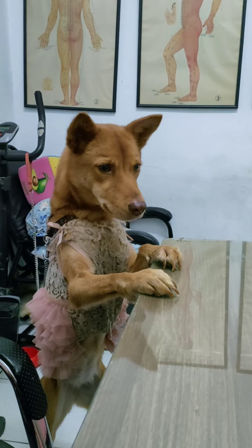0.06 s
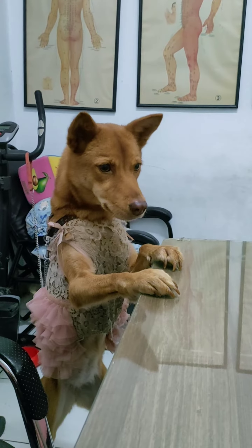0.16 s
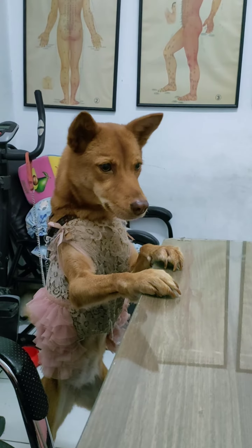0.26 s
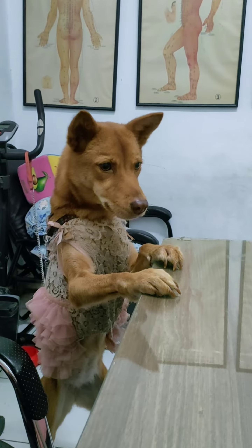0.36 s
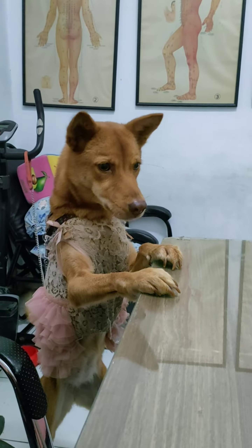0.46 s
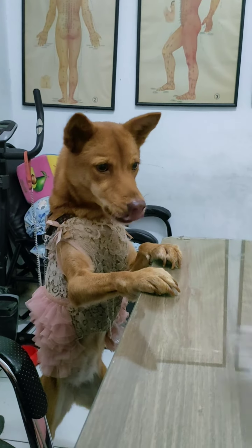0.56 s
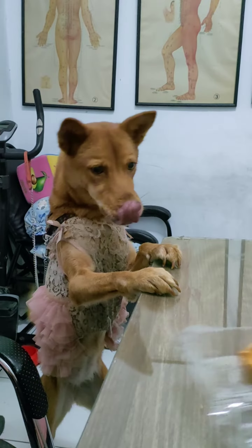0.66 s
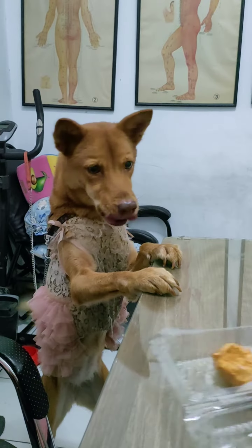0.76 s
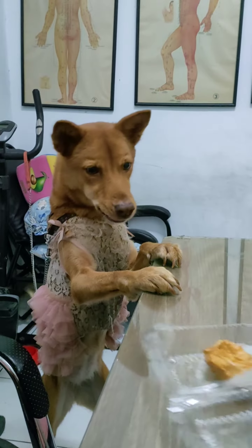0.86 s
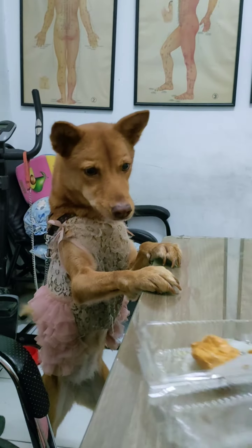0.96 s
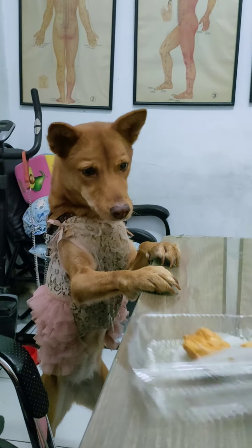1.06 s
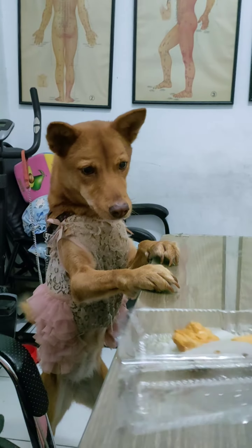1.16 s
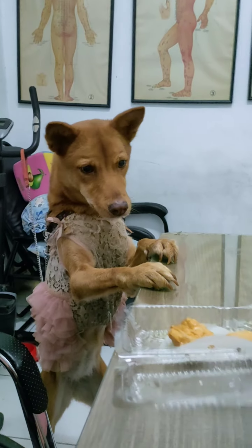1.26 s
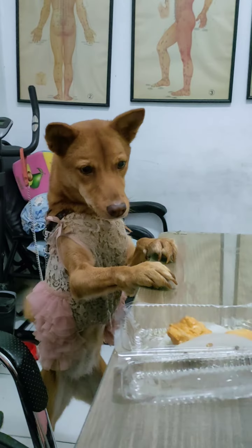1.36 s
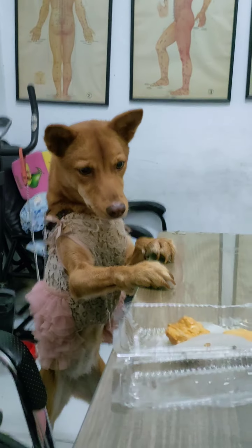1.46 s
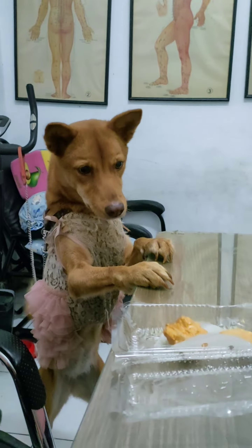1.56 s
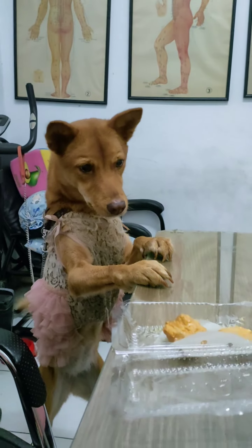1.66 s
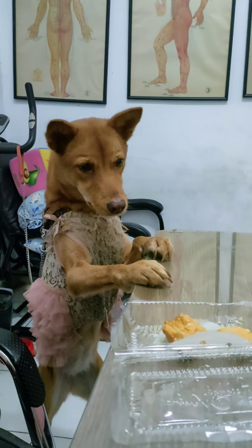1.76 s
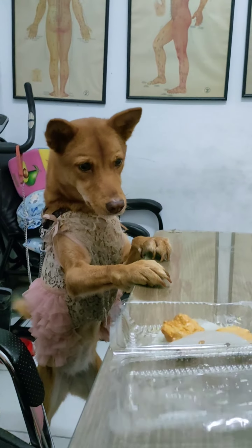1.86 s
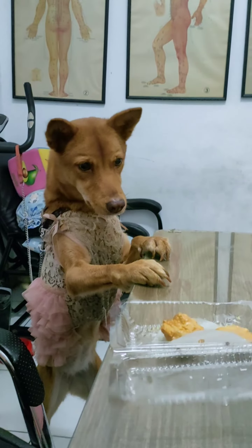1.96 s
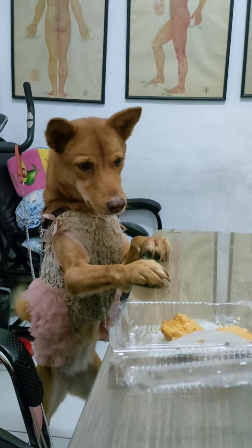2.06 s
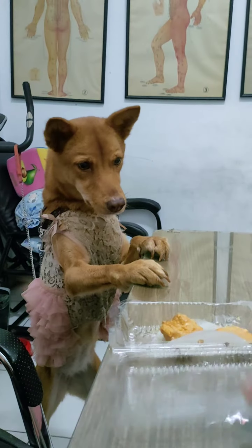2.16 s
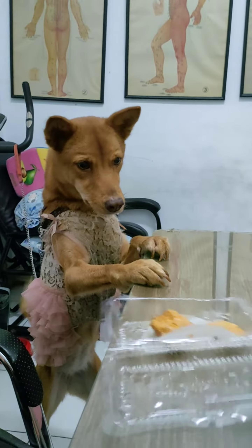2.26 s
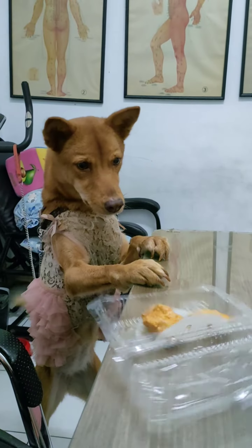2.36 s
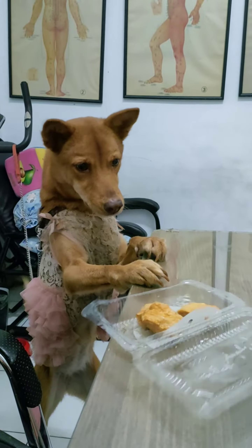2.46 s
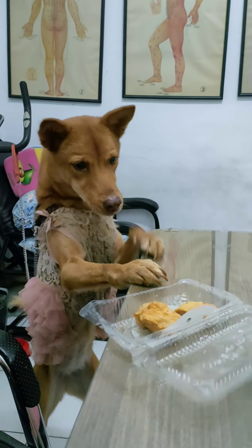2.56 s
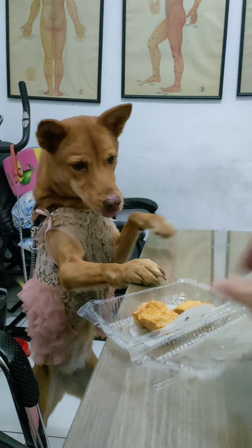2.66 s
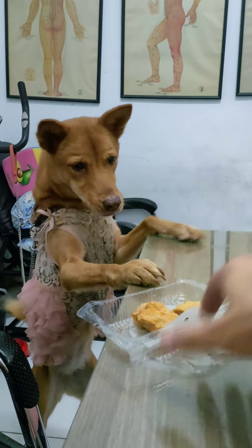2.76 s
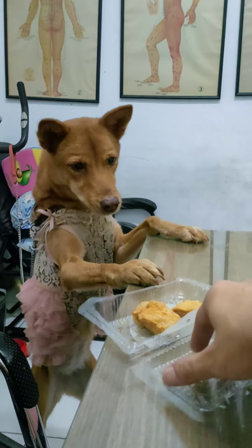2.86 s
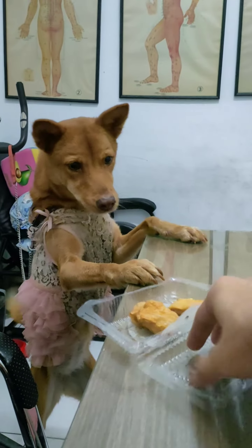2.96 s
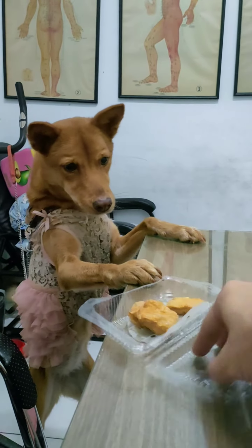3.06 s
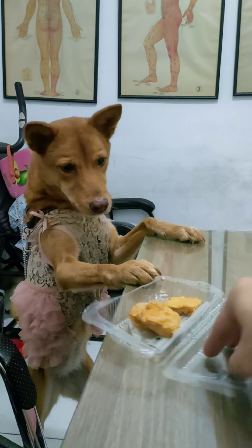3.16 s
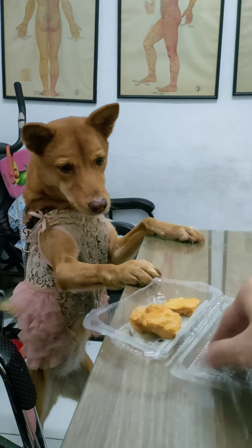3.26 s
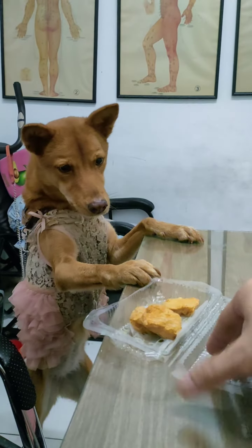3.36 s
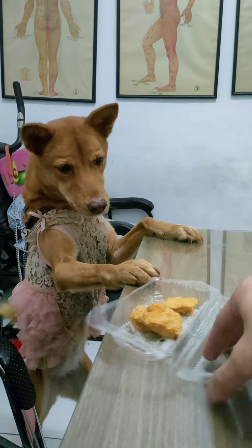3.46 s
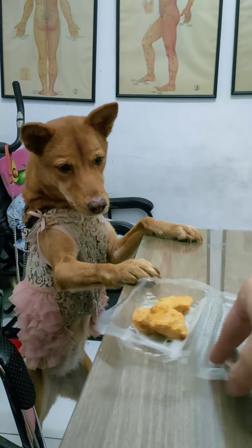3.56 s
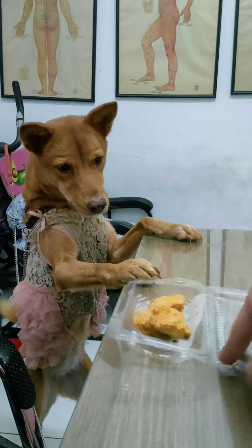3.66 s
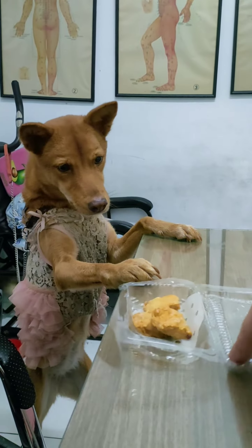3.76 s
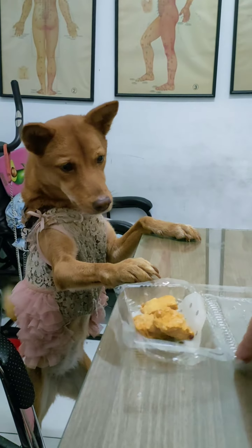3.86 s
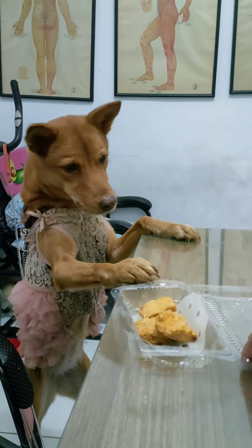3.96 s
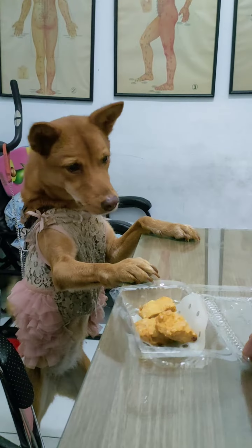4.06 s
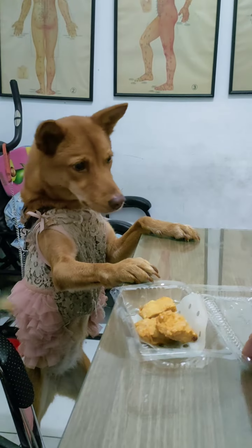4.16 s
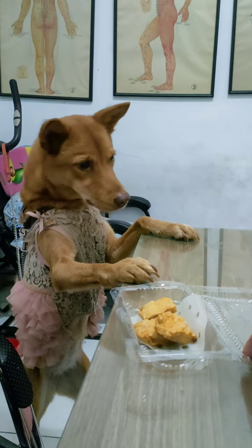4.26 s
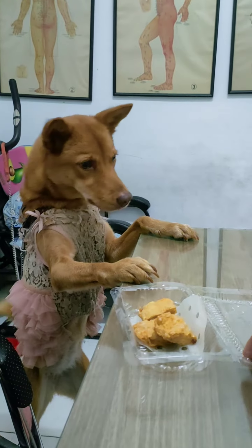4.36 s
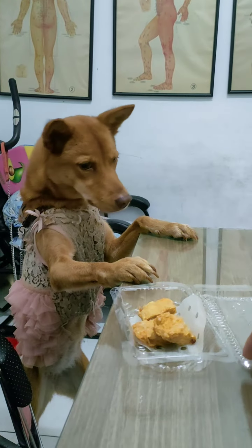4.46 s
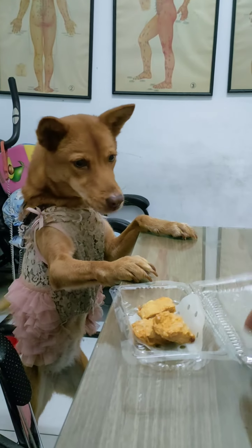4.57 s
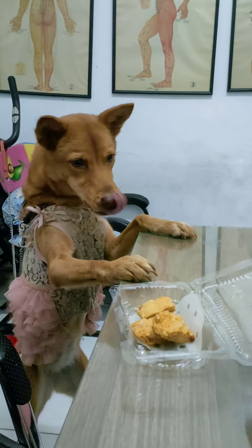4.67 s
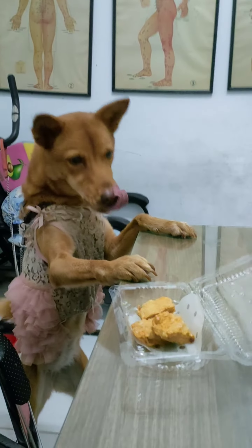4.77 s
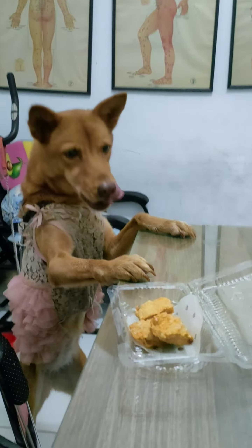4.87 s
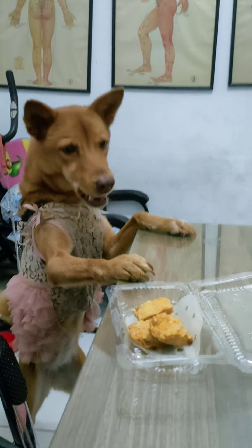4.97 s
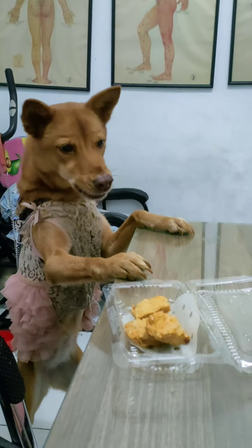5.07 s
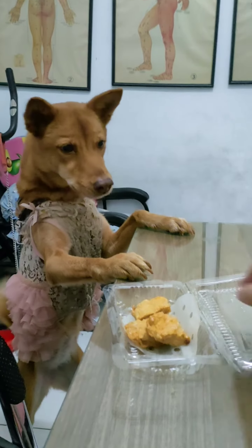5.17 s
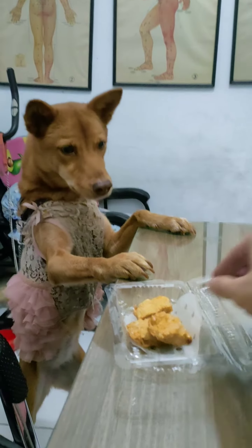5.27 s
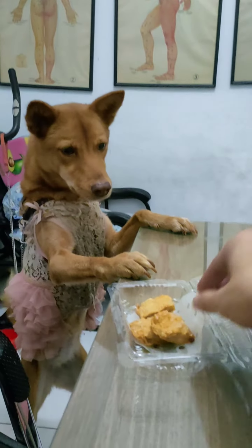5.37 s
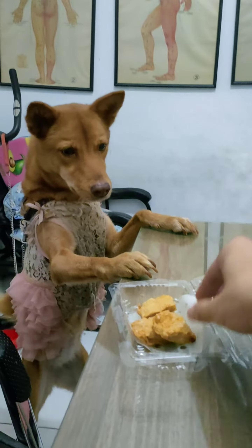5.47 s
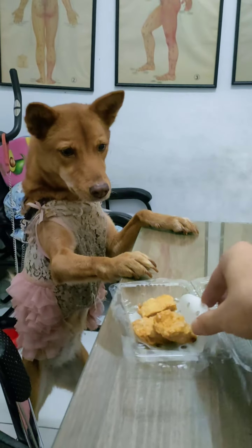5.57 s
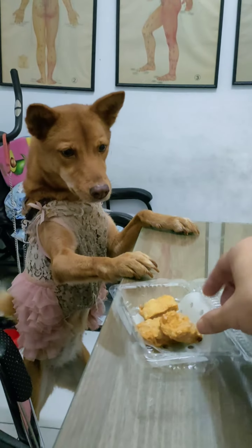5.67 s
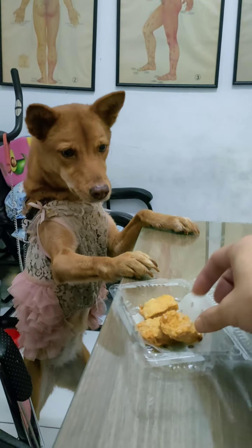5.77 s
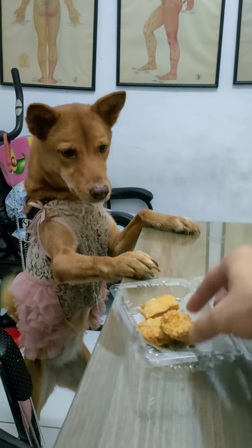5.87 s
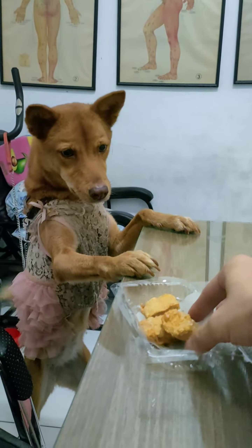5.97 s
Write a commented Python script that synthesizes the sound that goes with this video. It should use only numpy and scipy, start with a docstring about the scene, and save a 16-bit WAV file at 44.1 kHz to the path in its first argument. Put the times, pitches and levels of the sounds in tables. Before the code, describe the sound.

A thin, stiff plastic food tray is handled close to the microphone in a bare, hard-walled room. A dense flurry of crackles and sharp pops comes first, with one hard snap, then near quiet, small clicks, a louder crunchy burst as it is turned, more pops, and finally soft rubbing on paper. Low handling rumble and faint room hush lie underneath.

```python
"""A thin plastic food tray is carried to a table, set down, turned and opened close to a two-port microphone.
Wall snaps, fine crackle, knocks and drag noise drive one bank of resonant modes; at the end paper-liner rubs
are band-passed random grains. A bare, hard room answers with decaying noise bands. The hand on the microphone
adds resonant low rumble and decaying sine bumps; wavering sines whine faintly over a coloured-noise room tone."""
import sys
import numpy as np
from scipy import signal
from scipy.io import wavfile

SR = 44100
rng = np.random.default_rng(int(sys.argv[2]) if len(sys.argv) > 2 else 0)


def file_out(sig):
    """Save sig as 16-bit WAV at sys.argv[1]."""
    # one column per channel
    cols = np.atleast_2d(sig).T
    # limit, then scale
    lim = np.clip(cols, -1, 1)
    pcm = np.round(lim * 32767).astype(np.int16)
    wavfile.write(sys.argv[1], SR, pcm)


N = 265482

# wall snaps: start_s, drive_db, hollow_db, edge_db, length_ms (before low-mode stretch); colours re drive
WALL_SNAPS = [(0.09, -34, -12, -38, 4.6), (0.112, -32.5, -8, -26.5, 0.69), (0.147, -15.5, -17, -52, 2.4),
              (0.188, -26.5, -12.5, -24, 4.8), (0.216, -30.5, -15, -29, 3.3), (0.302, -27.5, -12, -12, 1.4),
              (0.371, -18.5, -16.5, -12.5, 1.3), (0.381, -5.5, -21, -6.5, 3), (0.396, -23.5, -17, -15, 0.9),
              (0.411, -20.5, -19.5, -21, 1.2), (0.418, -12, -15, -12, 1.16),
              (0.451, -15.5, -23.5, -16, 0.81), (0.456, -25.5, -11.5, -24, 0.81),
              (0.4668, -8, -18, -15.5, 0.56), (0.499, -18, -27.5, -8.5, 0.91),
              (0.511, -21.5, -23.5, -12, 4.4), (0.557, -13.5, -20, -7.5, 3.1),
              (0.567, -23.5, -8.5, 1.5, 0.66), (0.763, -41, 5, -21, 1.7), (0.824, -34.5, -4.5, -26, 1),
              (0.847, -33.5, -5, -23, 1.7), (0.917, -34.5, -13.5, -20.5, 5.7),
              (1.108, -20.5, -14, -1.5, 1.9), (1.1999, -1, -13.5, -3.5, 0.4), (1.761, -42, -9.5, -20, 1.06),
              (1.827, -32.5, -8, -13, 2.7), (1.844, -31.5, -2, -23, 1.9), (1.903, -28, -18, -8.5, 0.76),
              (1.914, -40.5, 12.5, -14, 3.3), (1.965, -37, -7, -8.5, 0.87), (2.186, -50.5, 1.5, -7, 0.84),
              (2.291, -29, 1.5, -2.5, 1.2), (2.309, -27.5, -8.5, -27, 1.3), (2.353, -18.5, -2, -6, 0.89),
              (2.359, -19, -10.5, -12, 1.6), (2.366, -21, -9, -16.5, 2.7), (2.416, -30.5, 3.5, -19, 1.1),
              (2.54, -22.5, -6, -16.5, 1.6), (2.557, -16.5, -11, -28.5, 0.78), (2.878, -43, -8, -1.5, 3),
              (2.925, -28.5, -6, -9, 2.1), (2.941, -26.5, -3, -7, 1.7), (2.978, -14, -21, -9.5, 2.4),
              (2.987, -12, -13, -10, 1.8), (2.997, -17.5, -9.5, -22, 2), (3.012, -11, -25.5, -10.5, 3.2),
              (3.03, -20, -16, -9, 1.6), (3.097, -10, -23, -10, 2.9), (3.12, -21.5, -22, 0, 5.3),
              (3.57, -17, -13.5, -11.5, 0.8), (3.641, -17.5, -14, -35, 1.8), (3.706, -36, -2, -11, 1.1),
              (3.709, -30, 7, -15, 0.45), (3.719, -22, 0, -25, 1.4), (3.73, -12, -16, -11.5, 2.2),
              (3.794, -25.5, 3.5, 0, 1.6), (3.803, -32.5, 6.5, -24, 1.7), (3.846, -21, -34, -6, 1.4),
              (3.855, -29, 0.5, -15, 3.3), (3.912, -15.5, -22, -20.5, 0.47), (4.011, -36, -4, -27, 2.9),
              (4.462, -41.5, -3.5, -5, 2.1), (4.587, -37, 5, -2.5, 2.9), (4.888, -51, 4.5, 12, 1.6),
              (4.912, -37.5, -13, -8, 0.37)]
# knocks on hand or table, mostly slow modes: start_s, drive_db
TRAY_KNOCKS = [(.148, -32.5), (0.188, -38.5), (.275, -39), (0.361, -26.5), (0.666, -36), (0.739, -35.5),
               (1.091, -43), (1.902, -28.5), (2.188, -42), (2.291, -38.5), (2.351, -29), (2.939, -32),
               (3.015, -28), (3.097, -26.5), (3.194, -28.5), (3.57, -33.5), (3.708, -26), (3.796, -26),
               (3.858, -30), (3.914, -38.5), (4.784, -43), (4.891, -44)]
# knock colour re drive: hollow_db, middle_db, edge_db
KNOCK_COLOUR_DB = (-9.5, -35.5, -45.5)
# pitches of the five blow colours, thud to top: pitch_hz
BLOW_COLOUR_HZ = [450, 1160, 2500, 5700, 11000]
# tray modes: pitch_hz, gain_db, t60_s, left_right_db
TRAY_MODES = [(141, -1.5, 0.031, -3.5), (236, 0, 0.043, -3.5), (361.4, 0, 0.015, 2),
              (550, -4.5, 0.022, 1.5), (797, 2.5, 0.0092, -11), (1163.5, 4.5, 0.023, -14.5),
              (1371, 5, 0.0095, -4.5), (1860, 5.5, 0.0051, -4), (2260, 3, 0.0081, 0.5),
              (2717, 2.5, 0.0084, -17), (3145, 1.5, 0.01, 6), (3772, 3, 0.0053, 1), (4620, 3, 0.0037, -8),
              (4990, 2.5, 0.0023, -2), (5594, 0.5, 0.0065, -4.5), (6370, -3.5, 0.0069, -3),
              (7210, -5.5, 0.0051, 5), (8060, -6, 0.0013, 0), (11060, -4, 0.0038, -9),
              (12760, -6, 0.0027, 13), (14800, -1, 0.0023, -2)]
# steady rustle of the held tray: time_s, drive_db
HELD_RUSTLE = [(0, -78), (.07, -52), (.36, -46.5), (.68, -50), (.81, -43), (.92, -53.5), (1.15, -50),
               (1.8, -73.5), (2.83, -73.5), (2.93, -48.5), (3.3, -53.5), (3.45, -55.5), (3.65, -62),
               (4.08, -49.5), (4.3, -69.5), (4.44, -50.5), (4.56, -72), (4.92, -61.5), (5.1, -68.5),
               (5.33, -56.5), (5.5, -77), (6.02, -94)]
# squeezes, rise and fade per 20 dB: peak_s, drive_db, rise_s, fade_s, brightness_db_per_octave
FINGER_SQUEEZES = [(0.3, -41.5, 0.053, 0.39, -11.5), (0.379, -33, 0.012, 0.16, -12),
                   (1.85, -42.5, 0.021, .15, -7), (1.909, -34.5, 0.0073, 0.055, -2.5),
                   (2.3, -40.5, 0.02, 0.09, -10), (2.358, -29, 0.0077, 0.041, -4.5),
                   (2.385, -54, .03, 0.35, 7), (2.54, -38.5, 0.038, 0.11, 2),
                   (2.986, -21.5, 0.012, 0.069, -2), (3.114, -33.5, 0.086, 0.051, -5),
                   (3.2, -34, 0.024, 0.018, 2), (3.722, -36.5, 0.042, 0.066, 2.5),
                   (3.803, -43, 0.023, 0.032, 11), (3.858, -37.5, 0.13, 0.048, -0.5),
                   (4.587, -43.5, 0.025, 0.053, 1), (4.649, -50.5, 0.2, 0.055, -3),
                   (5.07, -56, 0.14, 0.11, 0.5), (5.244, -58, 0.027, 0.044, 5)]
# crackle grain by grip: crackle_db, size_spread_db, loss_db_per_octave (under the knee)
GRIP_UNEVENNESS = [(-52, 1.2, 6), (-36, 4.2, 3)]
# tray and hand dragging on the table: time_s, drive_db
TABLE_DRAG = [(0.0, -80), (0.4, -66.5), (1.66, -78), (2.98, -72), (3.12, -54.5), (3.32, -78.5), (3.59, -76),
              (3.75, -59.5), (4.06, -83.5), (5.4, -71.5), (6.02, -80.5)]
# near sound at the two ports: pitch_hz, likeness (0-1)
PORT_LIKENESS = [(350, 0.92), (700, 0.6), (3000, 0.3), (9000, 0.1)]
# paper-liner rubs, rise and fade per 20 dB: peak_s, level_db, rise_s, fade_s, centre_hz
PAPER_RUBS = [(5.582, -53, .006, 0.084, 1880), (5.662, -46.5, 0.043, 0.064, 1580),
              (5.729, -50, 0.031, 0.056, 2050), (5.784, -53.5, 0.062, 0.064, 4250),
              (5.839, -54, 0.17, .02, 2200)]
# room echoes: pitch_hz, t60_s, level_db, left_right_db, likeness (0-1)
ROOM_BANDS = [(120, 0.36, -44.5, -5, 0.55), (306, 0.38, -26, 2.5, 0.61), (520, 0.51, -26, -4, 0.11),
              (1260, 0.47, -32.5, -6, 0.038), (2685, 0.62, -29, 0.5, 0.05), (5500, 0.53, -26, 1.5, 0.015),
              (12200, 0.53, -28, -2.5, 0.025)]
# nearest walls, above the echo cloud: delay_s, extra_db
NEAR_WALLS = [(0.016, 5), (0.024, 3.5)]
# grip shifts: start_s, level_db, pitch_hz, t60_s, left_right_db
GRIP_BUMPS = [(1.207, -30, 28.4, 0.12, -3), (1.649, -49, 45.7, 0.21, -16), (2.53, -46.5, 45, 0.21, -18),
              (4.909, -40, 44.3, 0.12, -17)]
# hand on the microphone: time_s, level_db
HAND_RUMBLE = [(0.0, -67), (0.39, -62.5), (1.54, -70.5), (2.33, -61), (2.87, -66), (3.19, -58.5),
               (4.71, -70), (4.9, -62), (6.02, -72.5)]
# whine tones: start_s, end_s, pitch_hz, level_db (rms)
WHINE_TONES = [(4.106, 4.346, 3280, -68), (4.2, 4.34, 1640, -73), (4.24, 4.374, 1156, -74.5),
               (4.318, 4.43, 1276, -69)]
# room tone shape: pitch_hz, density_db (per Hz, relative)
TONE_SHAPE = [(53, -33), (90, 2.5), (219, 8.5), (706, -56), (1160, -14.5), (1540, -5), (2760, -6.5),
              (6440, -12), (9110, 1.5), (11300, -31), (13200, -57.5), (16000, -62)]

THUD_DB, TOP_DB = -12, -5.5  # thud re hollow, top re edge
SNAP_MIDDLE_DB, KNOCK_MS = -9, 1.8
SLOW_STRETCH = .93  # power of the pitch ratio by which blows last longer in low modes
TRAY_DB, MODE_SPREAD_DB = 9, 3  # drive of all blows; each blow favours other modes
TICKS_PER_S, MODES_STRUCK_SHARE = 2200, .25  # share for an average crease; a large one strikes all
CRACKLE_KNEE_HZ, RUSTLE_BRIGHT_DB_PER_OCTAVE = 1680, 1.5
FLEX_DB, FLEX_S = 4, .025  # each mode comes and goes as the tray bends
DRAG_TOP_HZ = 600
CRACKLE_WET_DB, RUB_WET_DB = -6, -8
RUB_GRAINS_PER_S, RUB_BAND_RATIO = 6000, 1.3  # ratio either side of centre
WALL_DELAY_S, EARLY_DB, WALL_BLUR_S = .017, -7, .0035
ECHO_LUMP_DB, ECHO_LUMP_S = 3, .012
RUMBLE_HZ, RUMBLE_WIDTH_HZ, RUMBLE_LIKENESS = 42, 20, .42
WAVER_SHARE, WAVER_DB, WAVER_S = .003, 1.5, .025  # pitch share, level, knot spacing
TONE_DB = -67
MIC_ROLLOFF_HZ, OVERLOAD_PEAK, CUTOFF_HZ = 6300, .78, 16900


def tray():
    """Snaps, knocks, crackle and drag ring the same modes; returns near sound and what is sent to the walls."""
    blow_s, blow_db, colour_db, length_ms = blows()
    step = np.arange(900)
    start = np.round(blow_s * SR).astype(int)
    ticks, size, tick_db, tilt_db, loss_db = creases()
    drag = amp(in_time(TABLE_DRAG)[0])
    near, sent = np.zeros((2, N)), np.zeros(N)
    for k, (hz, gain_db, t60_s, lean_db) in enumerate(TRAY_MODES):
        fall = burst_shape(step, length_ms, hz)
        share = [np.interp(np.log(hz), np.log(BLOW_COLOUR_HZ), row) for row in np.eye(len(BLOW_COLOUR_HZ))]
        strength = amp(blow_db + share @ colour_db + TRAY_DB)
        towards_mic = strength * amp(MODE_SPREAD_DB * rng.standard_normal(len(blow_s)))

        octaves = np.log2(hz / CRACKLE_KNEE_HZ)
        tick = amp(tick_db + tilt_db * max(octaves, 0) + loss_db * min(octaves, 0))
        tick *= amp(FLEX_DB * wander(ticks / SR, FLEX_S))
        tick *= rng.random(len(ticks)) < MODES_STRUCK_SHARE * size

        # rows: two near signals, one to the walls; the tiny offset avoids denormals
        push = np.full((3, N), 1e-18)
        for part in push[:2]:
            burst = fall * rng.choice([-1, 1], fall.shape)
            # what the mode takes from each burst
            felt = np.abs(burst @ np.exp(2j * np.pi * hz / SR * step))
            scale = towards_mic / np.maximum(felt, .4)
            np.add.at(part, start[:, None] + step, scale[:, None] * burst)
            part[ticks] += tick * rng.standard_normal(len(ticks))
        if hz < DRAG_TOP_HZ:
            push += drag * rng.standard_normal((3, N))
        # over all directions the mode unevenness averages out
        np.add.at(push[2], start, strength * (-1) ** k)
        push[2, ticks] += amp(CRACKLE_WET_DB) * tick * rng.standard_normal(len(ticks))

        rings = amp(gain_db) * ring(push, hz, t60_s)
        near += pair(rings, at_hz(PORT_LIKENESS, hz)[0], lean_db)
        sent += rings[2]
    return near, sent


def blows():
    """Snaps and knocks as one list: start, drive, colour at five pitches, length."""
    rows = [(s, db, hollow + THUD_DB, hollow, SNAP_MIDDLE_DB, edge, edge + TOP_DB, ms)
            for s, db, hollow, edge, ms in WALL_SNAPS]
    knock_top_db = KNOCK_COLOUR_DB[-1] + TOP_DB
    rows += [(s, db, 0, *KNOCK_COLOUR_DB, knock_top_db, KNOCK_MS) for s, db in TRAY_KNOCKS]
    start_s, drive_db, *colour_db, length_ms = np.transpose(rows)
    return start_s, drive_db, np.array(colour_db), length_ms


def burst_shape(step, length_ms, hz):
    """A buckle runs along the wall as pushes that swell and die; slow modes feel it longer."""
    lasts_ms = np.clip(length_ms, .1, 8) * np.clip(2800 / hz, 1, 6) ** SLOW_STRETCH
    phase = step / (lasts_ms * SR / 2000)[:, None]  # peak at half length
    fall = phase * np.exp(-phase)
    return fall / np.sqrt(np.sum(fall ** 2, axis=1, keepdims=True))


def creases():
    """Random crackle ticks: gentle handling rustles evenly, a hard grip cracks."""
    ticks = np.flatnonzero(rng.random(N) < TICKS_PER_S / SR)
    level_db, tilt_db = crackle(ticks / SR)
    size = np.minimum(rng.exponential(1, len(ticks)), 4)
    grip_db, *rules = np.transpose(GRIP_UNEVENNESS)
    spread_db, loss_db = (np.interp(level_db, grip_db, rule) for rule in rules)
    return ticks, size, level_db + spread_db * size, tilt_db, loss_db


def crackle(t):
    """Crackle drive and brightness: powers of rustle and squeezes add, the loudest dominates the colour."""
    peak_s, db, rise_s, fade_s, bright_db = np.transpose(FINGER_SQUEEZES)[:, :, None]
    flares = swell_20db(t, peak_s, db, rise_s, fade_s) ** 2
    rustle = amp(np.interp(t, *np.transpose(HELD_RUSTLE))) ** 2
    power = rustle + flares.sum(axis=0)
    bright = RUSTLE_BRIGHT_DB_PER_OCTAVE * rustle + (bright_db * flares).sum(axis=0)
    return 10 * np.log10(power), bright / power


def ring(push, hz, t60_s):
    """One mode: a two-pole resonator with zeros at DC and Nyquist."""
    r, w = amp(-60 / (max(t60_s, .001) * SR)), 2 * np.pi * hz / SR
    gain = np.sqrt(1 - r * r) / 2
    return signal.lfilter(gain * np.array([1, 0, -1]), [1, -2 * r * np.cos(w), r * r], push)


def rubs():
    """Fingers on paper: dense fibre grains through one broad band per rub."""
    t, out = np.arange(N) / SR, 0
    for peak_s, db, rise_s, fade_s, hz in PAPER_RUBS:
        struck = rng.random(N) < RUB_GRAINS_PER_S / SR
        grains = rng.standard_normal((2, N)) * rng.exponential(1, N) * struck
        edges_hz = [hz / RUB_BAND_RATIO, hz * RUB_BAND_RATIO]
        band = signal.sosfilt(signal.butter(1, edges_hz, "band", fs=SR, output="sos"), grains)
        swell = swell_20db(t, peak_s, db, rise_s, fade_s)
        out = out + swell * pair(band / band.std(), at_hz(PORT_LIKENESS, hz)[0], -3.8)
    return out


def room(x):
    """Lumpy dense echoes die band by band; table and furniture return a little before the late walls."""
    t, echo = np.arange(int(.9 * SR)) / SR, 0
    for hz, noise in bands(len(t)):
        t60_s, db, lean_db, alike = at_hz(ROOM_BANDS, hz)
        lumps_db = ECHO_LUMP_DB * wander(t, ECHO_LUMP_S)
        echo = echo + pair(noise, alike, lean_db) * amp(db + lumps_db - 60 * t / t60_s)
    early = amp(EARLY_DB)
    arrival_s = [.002, .004, WALL_DELAY_S - .002, WALL_DELAY_S + .002]
    arrival = np.interp(t, arrival_s, [0, early, early, 1])
    arrival *= amp(sum(db * np.exp(-((t - s) / WALL_BLUR_S) ** 2) for s, db in NEAR_WALLS))
    return signal.fftconvolve(echo * arrival, x[None])[:, :N]


def bumps():
    """Each grip shift is one slow sine swing that swells and dies."""
    out = np.zeros((2, N))
    for start_s, db, hz, t60_s, lean_db in GRIP_BUMPS:
        t = np.maximum(np.arange(N) / SR - start_s, 0)
        swing = np.sin(2 * np.pi * hz * t) * amp(db - 60 * t / t60_s) * (1 - np.exp(-4 * hz * t))
        out += swing * amp([[lean_db / 2], [-lean_db / 2]])
    return out


def rumble():
    """Hand on the microphone: white noise twice through one broad low resonance."""
    r, w = np.exp(-np.pi * RUMBLE_WIDTH_HZ / SR), 2 * np.pi * RUMBLE_HZ / SR
    x = rng.standard_normal((2, N + SR))
    for _ in range(2):
        x = signal.lfilter([1, 0, -1], [1, -2 * r * np.cos(w), r * r], x)
    x = x[:, SR:]  # drop the filter's settling
    return amp(in_time(HAND_RUMBLE)[0]) * pair(x / x.std(), RUMBLE_LIKENESS, -1.5)


def whine():
    """Thin sines, wavering in pitch and level, fade in and out."""
    t, out = np.arange(N) / SR, 0
    for start_s, end_s, hz, db in WHINE_TONES:
        swell = np.sqrt(np.sin(np.pi * np.clip((t - start_s) / (end_s - start_s), 0, 1)))
        turns = np.cumsum(hz * (1 + WAVER_SHARE * wander(t, WAVER_S))) / SR
        level = np.sqrt(2) * amp(db + WAVER_DB * wander(t, WAVER_S))
        out = out + level * swell * np.sin(2 * np.pi * turns)
    return out


def room_tone():
    """Steady coloured hush, as alike at the two ports as the room's echoes."""
    x = sum(amp(at_hz(TONE_SHAPE, hz)[0]) * pair(noise, at_hz(ROOM_BANDS, hz)[3], -2.8)
            for hz, noise in bands(N))
    return amp(TONE_DB) * x / x.std()


def amp(db):
    """Decibels to gain."""
    return 10 ** (np.asarray(db) / 20)


def swell_20db(t, peak_s, db, rise_s, fade_s):
    """Gain that rises to a peak and fades exponentially, 20 dB per rise or fade time."""
    return amp(db - 20 * np.maximum((peak_s - t) / rise_s, (t - peak_s) / fade_s))


def wander(t, knot_s):
    """Random walk-free drift: unit normal knots joined by straight lines."""
    knots = np.arange(0, N / SR + knot_s, knot_s)
    return np.interp(t, knots, rng.standard_normal(len(knots)))


def in_time(rows):
    """Columns of a time table at every sample."""
    s, *columns = np.transpose(rows)
    return [np.interp(np.arange(N) / SR, s, c) for c in columns]


def at_hz(rows, hz):
    """Columns of a frequency table at one pitch, on a log axis."""
    f, *columns = np.transpose(rows)
    return [np.interp(np.log(hz), np.log(f), c) for c in columns]


def pair(noise, alike, lean_db=0):
    """Left and right from a shared and an opposed signal."""
    alike = np.clip(alike, -1, 1)
    shared = np.sqrt((1 + alike) / 2) * noise[0]
    opposed = np.sqrt((1 - alike) / 2) * noise[1] * [[1], [-1]]
    return (shared + opposed) * amp([[lean_db / 2], [-lean_db / 2]])


def bands(length):
    """Half-octave bands of two stereo white noises, as (centre Hz, band); neighbours are unrelated."""
    white = rng.standard_normal((2, 2, length))
    edges_hz = 90 * 2 ** np.arange(0, 7.8, .5)
    for k, (low, high) in enumerate(zip(edges_hz, edges_hz[1:])):
        sos = signal.butter(2, [low, high], "band", fs=SR, output="sos")
        yield np.sqrt(low * high), signal.sosfilt(sos, white[k % 2])


def scene():
    """Tray, paper, their echoes, grip, whine and hush."""
    near, sent = tray()
    paper = rubs()
    echoes = room(sent + amp(RUB_WET_DB) * paper[0])
    return near + paper + echoes + bumps() + rumble() + whine() + room_tone()


def record(dry):
    """The capsule dulls the treble, peaks are rounded, the top is cut."""
    dull = signal.sosfilt(signal.butter(2, MIC_ROLLOFF_HZ, fs=SR, output="sos"), dry)
    rounded = OVERLOAD_PEAK * np.tanh(dull / OVERLOAD_PEAK)
    return signal.sosfilt(signal.cheby2(12, 70, CUTOFF_HZ, fs=SR, output="sos"), rounded)


dry = scene()
out = record(dry)
file_out(out)
```